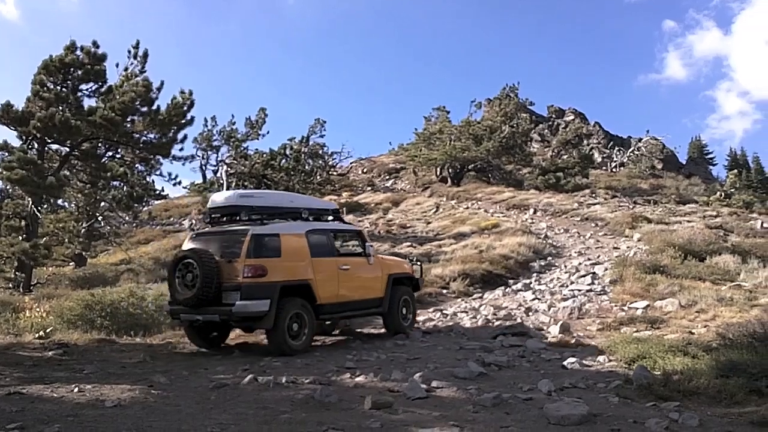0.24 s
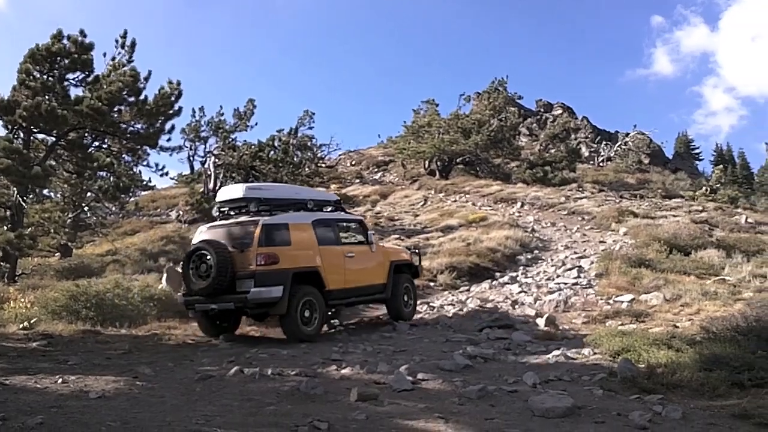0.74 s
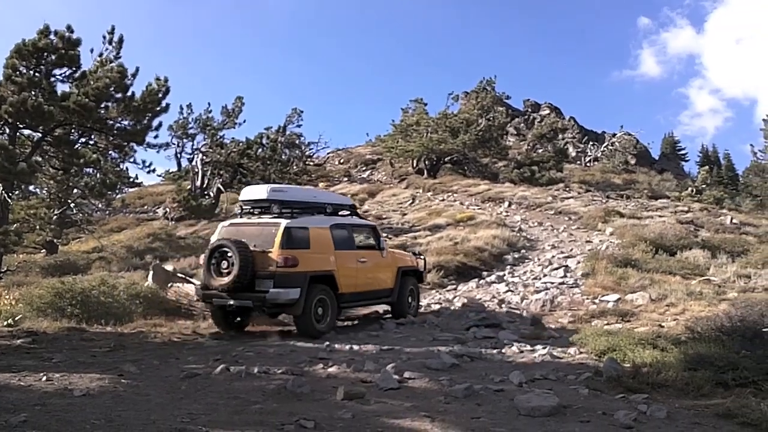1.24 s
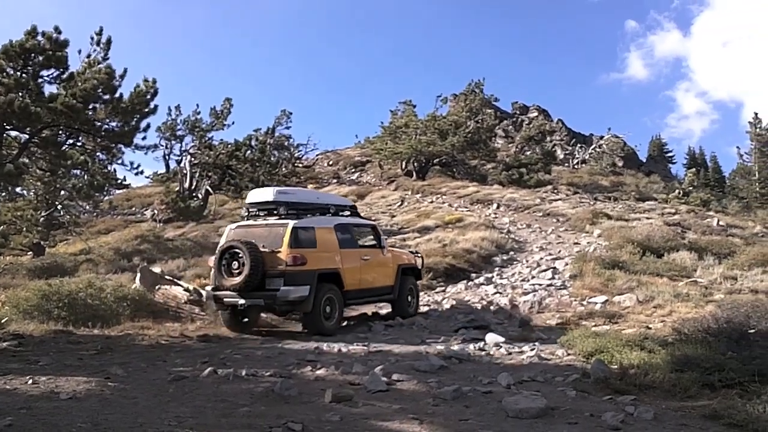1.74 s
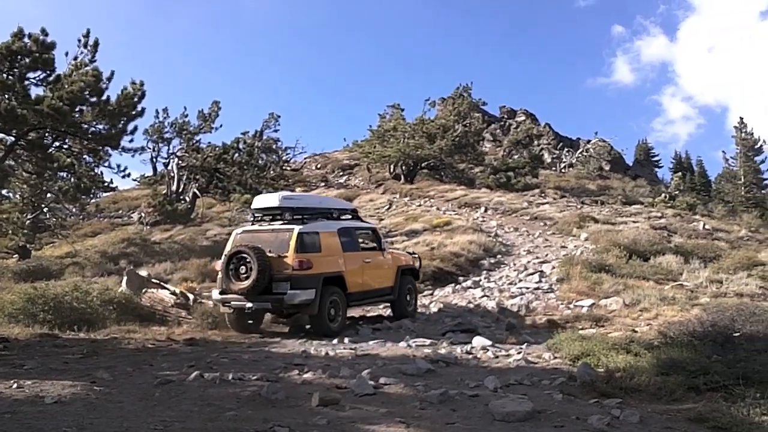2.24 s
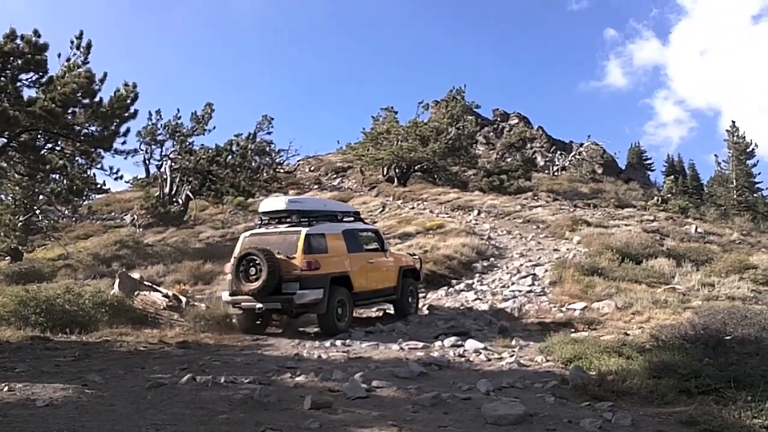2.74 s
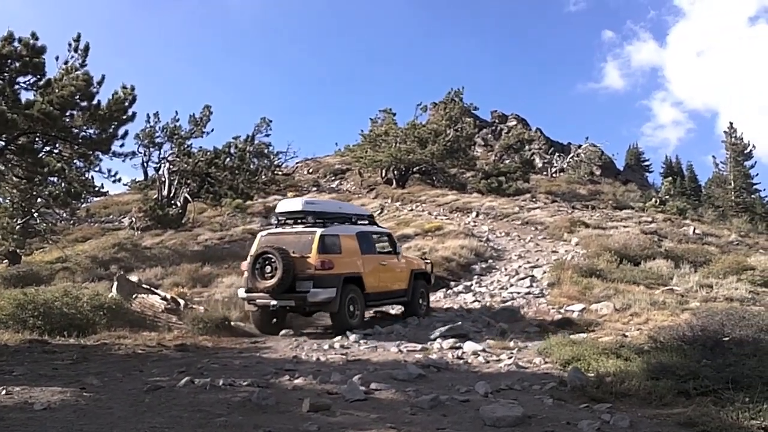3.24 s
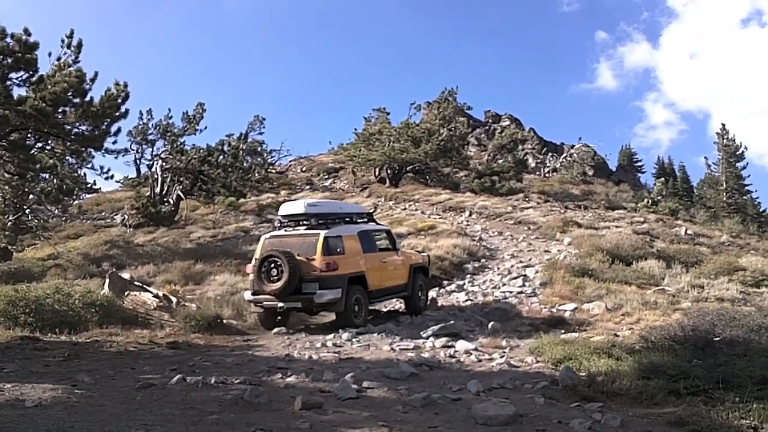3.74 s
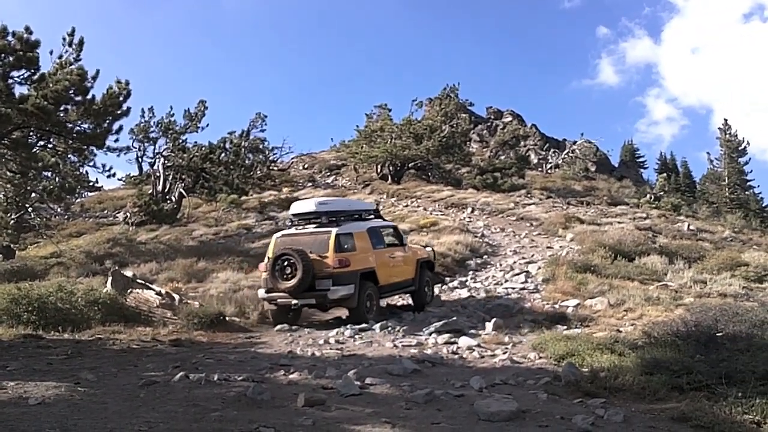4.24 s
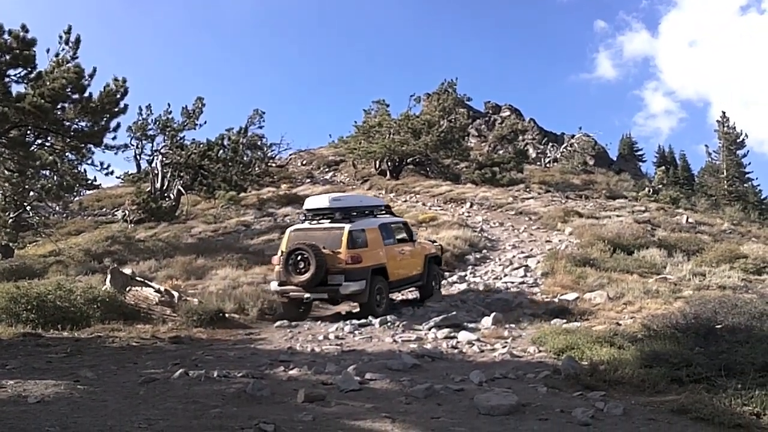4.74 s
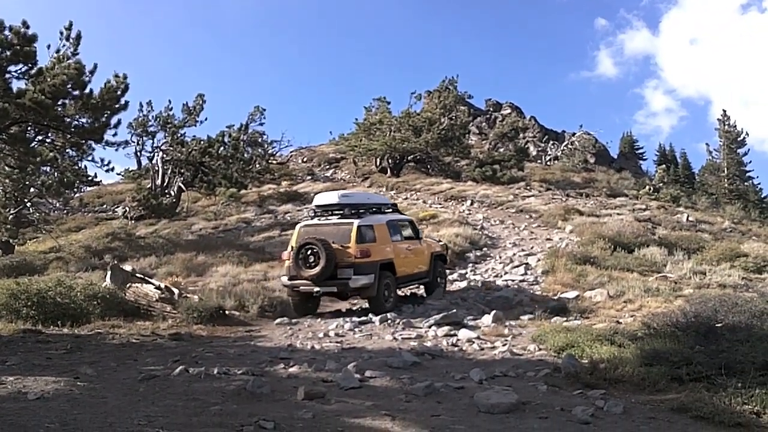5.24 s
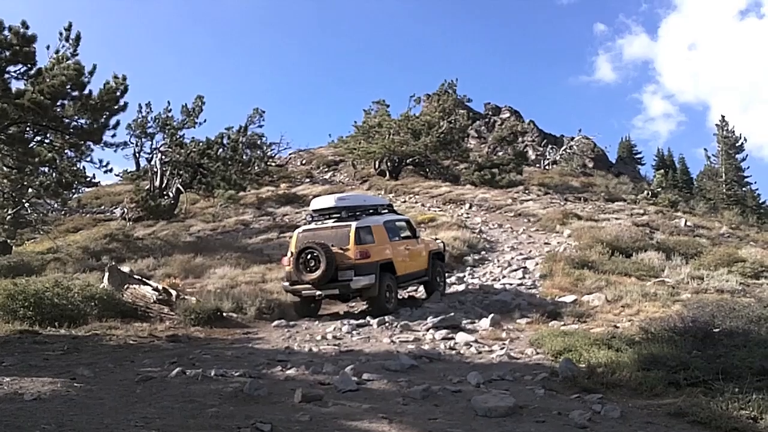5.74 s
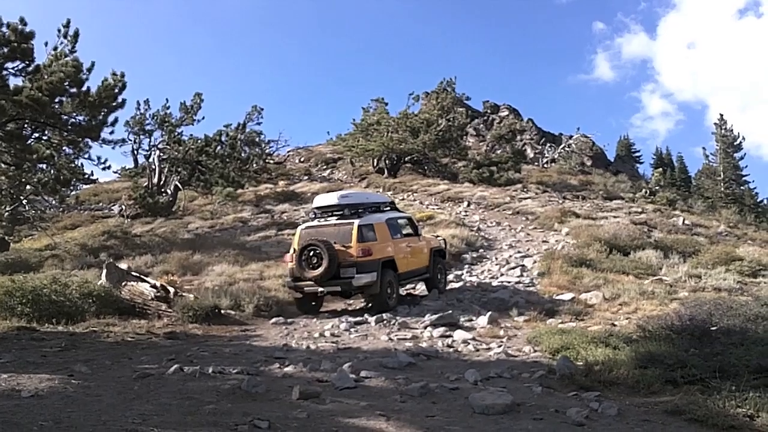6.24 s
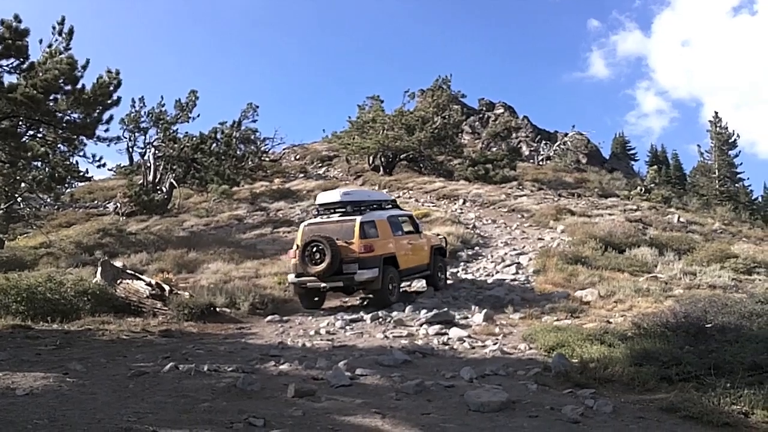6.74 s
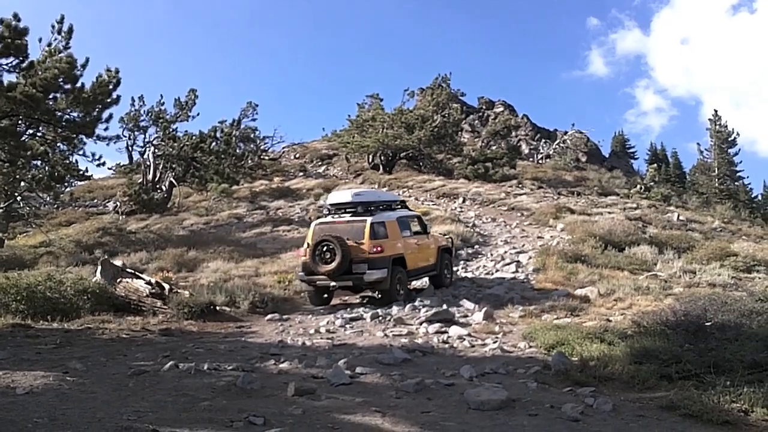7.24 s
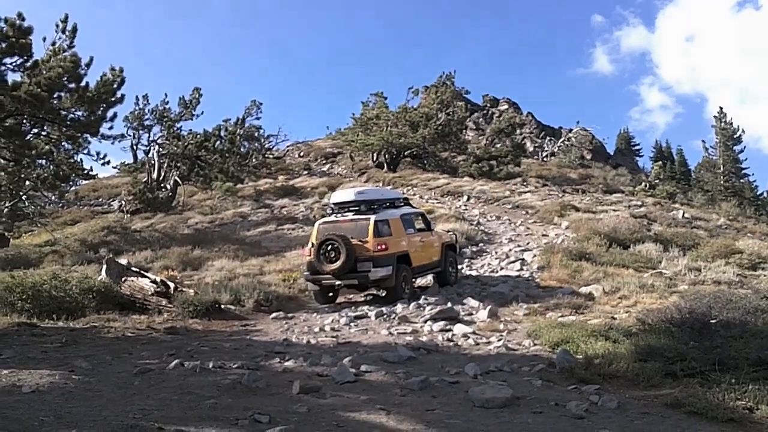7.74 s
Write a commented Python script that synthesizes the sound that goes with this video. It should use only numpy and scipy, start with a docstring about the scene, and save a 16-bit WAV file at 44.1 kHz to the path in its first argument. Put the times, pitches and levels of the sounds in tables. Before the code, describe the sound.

An off-road vehicle's engine booms in low gear, rising and falling as stones knock under its tyres, then drops to idle.

```python
"""Off-roader on a stony climb

A V6 crawls up a mountain track in low gear, drawing away, and drops to idle at the end.
Exhaust pulses ring the pipe, which booms under throttle; gas rasps, fan and gravel hiss,
stones knock under the tyres and the body thuds off a step. A small bird chips in the scrub,
and the open hillside gives stones and bird only a short scatter."""
import sys
import numpy as np
from scipy import signal
from scipy.fft import rfft, irfft, next_fast_len
from scipy.io import wavfile
from scipy.ndimage import uniform_filter1d, map_coordinates

SR = 44100
rng = np.random.default_rng(int(sys.argv[2]) if len(sys.argv) > 2 else 0)


def digitize_waveform(pressure):
    """Quantize a signal to 16-bit integers and store it at the path in sys.argv[1].

    Rows of a 2-D input are taken as channels; values are limited to [-1, 1].
    """
    field = np.atleast_2d(pressure).T
    bounded = np.clip(field, -1, 1)
    quanta = np.round(bounded * 32767).astype(np.int16)
    wavfile.write(sys.argv[1], SR, quanta)


N = 352359
TIME = np.arange(N) / SR


# Engine speed, as the firing rate of one cylinder bank: t/s, f/Hz
BANK_RATE = [(0.0, 26.69), (0.32, 29.43), (1.11, 29.38), (1.42, 26.1), (1.72, 25.44), (2.19, 27.63),
             (3.17, 27.01), (3.19, 26.29), (3.53, 26.76), (3.91, 25.65), (4.27, 26.83), (4.58, 24.12),
             (5.03, 23.44), (5.51, 20.85), (6.12, 26.97), (6.38, 26.78), (6.78, 23.44), (7.09, 19.08),
             (7.98, 19.18)]
# Hard pulls, a labouring crawl, then the throttle shuts and the idle recovers: t/s, level/dB
ENGINE_LOAD = [(0, -41.5), (.25, -36), (.95, -37.5), (1.4, -44), (2.15, -41), (3.9, -43.5), (5.6, -41),
               (6.2, -44), (6.85, -42.5), (6.98, -46.5), (7.18, -45.5), (7.28, -56.5), (7.44, -57),
               (7.7, -50)]

def engine(flywheel_s=0.12, wobble=0.0029):
    """The flywheel rounds off each change of speed; gives bank rate, cycles fired and load."""
    hz = uniform_filter1d(curve(TIME, BANK_RATE), int(flywheel_s * SR), mode="nearest")
    cycles = np.cumsum(hz * (1 + wobble * walk(18))) / SR
    return hz, cycles, curve(TIME, ENGINE_LOAD)


# Resonances of the exhaust pipe: f/Hz, width/Hz, level/dB
PIPE_MODES = [(53.6, 13, -10), (117.5, 11, 4.2), (162, 30, -5), (213, 25, -3)]
# Harmonics of the firing pulses: multiple of the bank rate, level/dB
PULSE_HARMONICS = [(2, 7), (3, -4), (5, 0.3), (6, 5), (7, -8), (8, 2.2), (9, -14.5), (10, -5), (11, -12.5)]

def exhaust(hz, cycles, load_db, roughness=0.12, idle_db=-10, muffler_hz=250):
    """Pulse harmonics sweep through the pipe's resonances; the muffler swallows the high ones."""
    idle = np.interp(hz, [19.6, 21.6], [1, 0])  # the throttle closes between these bank rates
    out = 0
    for k, db in PULSE_HARMONICS:
        ring = np.interp(TIME, TIME[::64], resonance(k * hz[::64], PIPE_MODES))
        # at idle the low harmonics fade and leave the sixth, sitting on the main resonance
        ease_db = 0 if k == 6 or k > 9 else idle_db / 2 if k == 2 else idle_db
        muffler = 1 / np.hypot(1, (k * hz / muffler_hz) ** 8)
        gain = undb(load_db + db + idle * ease_db) * muffler * (1 + roughness * walk(24))
        out += gain * np.real(ring * np.exp(2j * np.pi * k * cycles))
    return np.sqrt(2) * out


# The boom swells as the fourth harmonic climbs: f/Hz, level/dB
BOOM_SWELL = [(76, -65.5), (88, -50.5), (96, -42), (102, -39), (105.2, -33), (109.2, -23.5), (110.4, -21),
              (114, -18.5), (120, -18)]
# Bite of the harder pulses: multiple of the bank rate, level/dB against the boom
BOOM_OVERTONES = [(11, -38), (12, -33), (15, -37), (16, -36), (18, -37), (32, -51)]

def pipe_boom(hz, cycles, surge_db=0.16):
    """Under throttle the fourth harmonic climbs onto the pipe's main resonance and booms."""
    surge = np.gradient(hz, TIME)  # Hz/s: louder while gathering speed, softer while slowing
    level_db = curve(4 * hz, BOOM_SWELL) + surge_db * surge
    boom = np.cos(8 * np.pi * cycles + np.angle(resonance(4 * hz, PIPE_MODES)))
    bite = sum(undb(db) * (1 + 0.33 * walk(12)) * np.cos(2 * np.pi * k * cycles)
               for k, db in BOOM_OVERTONES)
    return np.sqrt(2) * (boom + bite) * undb(level_db) * (1 + 0.05 * walk(30))


# Hollow rumble of gas in the pipe: f/Hz, level/dB
FLOW_COLOUR = [(15, -4.5), (50, -9.5), (75, -11), (120, 8), (175, -4.5), (222, 4.5),
               (262, -17.5), (500, -42.5), (2000, -75.5)]

def gas_flow(hz, load_db):
    """Turbulent gas rings the same pipe; less flows as the engine slows."""
    rumble = colour(rng.standard_normal(N), FLOW_COLOUR)
    return rumble * undb(load_db - 0.5) * hz / hz.mean()


# Throaty midrange of the gas: f/Hz, level/dB
RASP_COLOUR = [(180, -12.5), (250, 1.5), (320, 0), (385, -5.5), (445, 1), (520, 0.5), (600, -11.5),
               (690, -20), (900, -27.5), (1300, -53.5)]

def gas_rasp(hz, cycles, load_db, throb=0.05, load_share=0.25):
    """Gas rasps in puffs at the bank rate, a little harder under load."""
    puffs = 1 + throb * np.cos(2 * np.pi * cycles)
    rasp = colour(rng.standard_normal(N) * puffs, RASP_COLOUR)
    effort_db = load_share * (load_db - np.median(load_db))
    level_db = -49 + effort_db + drive_db(hz, db_per_octave=18, db_per_s=-0.6)
    return rasp * undb(level_db + 0.99 * walk(12))


# Hiss shared by the fan and the tyres: f/Hz, level/dB
HISS_COLOUR = [(350, -22.5), (600, -2.5), (694, -10), (911, -5.5), (1160, -12.5), (1370, -7.5),
               (1550, -11.5), (1940, -8.5), (2410, -12.5), (2730, -19.5), (3070, -11.5), (4150, -11),
               (4800, -14.5), (5500, -37.5), (6120, -28), (7960, -54), (13500, -120)]

def fan_and_grit(hz, grains_per_s=500, grit_db=-10, spread_db=5):
    """The fan hisses with a slight flutter, and grit crackles under the tyres."""
    fan = colour(rng.standard_normal(N), HISS_COLOUR) * undb(walk(25))
    grains = (rng.random(N) < grains_per_s / SR) * rng.standard_normal(N)
    grains *= undb(spread_db * np.minimum(rng.exponential(size=N), 4))
    grit = undb(grit_db) * colour(grains, HISS_COLOUR)
    return (fan + grit) * undb(-55 + drive_db(hz, db_per_octave=11.5, db_per_s=-0.7025))


# Stones struck or ground by the tyres: t/s, contact/dB, ring/Hz, top cut/Hz, decay/s, grind/dB
STONE_HITS = [(.273, -25, 1420, 3500, .022, -13), (.282, -24.5, 1960, 4000, .02, -19.5),
              (0.502, -35, 1200, 6080, 0.052, -8.5), (1.023, -40, 2220, 9000, .17, 6.5),
              (1.096, -40, 3500, 9000, 0.17, -0.5), (2.701, -41.5, 1290, 1980, .05, 0),
              (2.972, -36.5, 3740, 8940, 0.068, -5), (3.492, -37.5, 594, 3020, 0.043, -6),
              (4.124, -38.5, 3500, 6000, 0.28, -5.5), (4.301, -37, 3740, 10000, 0.21, 3.5),
              (4.369, -25, 2100, 2270, 0.035, 6.5), (4.375, -35, 600, 4000, 0.16, -1.5),
              (4.479, -39.5, 4230, 8000, .027, -13), (5.191, -37, 3600, 6500, .16, 1.5),
              (6.215, -39.5, 770, 5000, 0.12, -6.5), (6.517, -31, 2200, 6000, 0.077, -4),
              (6.538, -37, 3370, 5000, .051, -2), (6.624, -34, 900, 4000, 0.093, -2.5),
              (6.637, -32.5, 720, 2000, 0.13, -2), (6.645, -32, 1260, 2000, 0.098, -9),
              (6.648, -34.5, 3360, 6040, .077, -6.5), (7.466, -48, 3520, 5000, .02, -6)]
# How a stone rings: multiple of its ring frequency, width over frequency, level/dB
STONE_RING = [(.55, 0.41, 0), (0.999, 0.17, 0), (1.901, 0.88, -7)]
# Tone of the stone knocks, full in the mids, with a dull, notched top: f/Hz, level/dB
STONE_COLOUR = [(150, -24), (450, -6), (4900, 1), (5500, -24), (6700, -11), (7800, -38), (10000, -9.5),
                (14000, -31)]

def stones(grind_trim_db=-6, softness=1.55):
    """Each stone gives one sharp contact, then a dying run of small slips, all ringing its modes."""
    out, t = np.zeros(N), TIME[:SR // 4]
    lead = 64  # samples ahead of the contact
    for start, peak_db, hz, cut_hz, t60, grind_db in STONE_HITS:
        modes = [(hz * ratio, hz * ratio * width, db) for ratio, width, db in STONE_RING]

        def ring(f):
            dull = np.hypot(1, (f / (softness * hz)) ** 2)  # bigger, lower stones touch for longer
            blunt = np.hypot(1, (f / cut_hz) ** 4)  # a blunt contact cuts off the top
            return resonance(f, modes) * undb(curve(f, STONE_COLOUR)) / (dull * blunt)

        contact = shape(signal.unit_impulse(len(t), lead), ring)
        slips = rng.standard_normal(len(t)) * (rng.random(len(t)) < 0.15)
        envelope = undb(-60 * t / t60) * np.clip((t * SR - lead) / lead, 0, 1)
        grind = undb(grind_db + grind_trim_db) * unit(shape(slips, ring)) * envelope
        add(out, start - lead / SR, undb(peak_db) * (contact / np.abs(contact).max() + grind))
    return out


# Dull thuds as the wheels drop off a step: t/s, level/dB, f/Hz
WHEEL_DROPS = [(5.82, -28.5, 42), (5.935, -35, 36), (5.94, -34, 85), (5.999, -34, 35)]

def body_thuds(decay_s=0.016):
    """The body takes each drop with a few heavily damped swings."""
    out, t = np.zeros(N), TIME[:SR // 4]
    envelope = t / decay_s * np.exp(1 - t / decay_s)
    for start, db, hz in WHEEL_DROPS:
        add(out, start, undb(db) * envelope * np.sin(2 * np.pi * hz * t))
    return out


# Chips from the scrub: t/s, length/s, starting f/Hz, level/dB
BIRD_NOTES = [(1.62, .066, 4910, -52.5), (2.733, 0.029, 5850, -57), (3.39, 0.033, 5150, -52.5),
              (3.751, .028, 6140, -62.5), (4.04, 0.066, 5700, -68), (5.739, .038, 5900, -71),
              (7.498, 0.092, 4800, -57.5)]

def bird(top_hz=6100, hoarse_hz=370, overtone_db=-22, fade_db=-7):
    """Short, hoarse notes: a narrow band of noise steps to the same high pitch as it fades."""
    def band(f):
        return np.exp(-(f / hoarse_hz) ** 2 / 2)

    out = np.zeros(N)
    for start, length, start_hz, db in BIRD_NOTES:
        progress = np.linspace(0, 1, int(length * SR))
        a, b = (unit(shape(rng.standard_normal(SR // 4), band))[:len(progress)] for _ in range(2))
        step = (1 + np.tanh(14 * (progress - 0.45))) / 2
        pitch = start_hz + (top_hz - start_hz) * step
        tone = np.exp(2j * np.pi * np.cumsum(pitch) / SR)
        swell = np.sqrt(np.abs(np.sin(np.pi * progress))) * undb(db + fade_db * progress)
        add(out, start, swell * np.real((a + 1j * b) * (tone + undb(overtone_db) * tone ** 2)))
    return out


def hillside(x, wet_db=-12, t60=0.81):
    """Rocks and scrub scatter a short, thin tail."""
    t = TIME[:SR // 2]
    tail = rng.standard_normal(len(t)) * undb(-60 * t / t60) * (t > 0.004)
    return x + undb(wet_db) * signal.fftconvolve(x, tail / np.linalg.norm(tail))[:N]


# Bed of still mountain air: f/Hz, level/dB
AIR_COLOUR = [(25, -10.5), (100, 0.5), (220, 6.5), (330, -21), (900, -29), (2200, -28.5), (4400, -26.5),
              (5600, -38), (8000, -42.5), (14000, -39.5)]

def still_air(level_db=-55):
    """A steady low hush with a faint, airy top."""
    return undb(level_db) * colour(rng.standard_normal(N), AIR_COLOUR)


def drive_db(hz, db_per_octave, db_per_s, crawl_hz=26, halt_s=7.34):
    """Fader for rasp and hiss: up with engine speed, down with distance, dying away after the halt."""
    halt_db = -12 * np.maximum(TIME - halt_s, 0)
    return db_per_octave * np.log2(hz / crawl_hz) + db_per_s * TIME + halt_db


def undb(db):
    """Decibels to gain."""
    return 10 ** (np.asarray(db) / 20)


def unit(x):
    """Scale to rms 1."""
    return x / np.sqrt(np.mean(x ** 2))


def curve(x, table):
    """Read a two-column table at x, along straight lines."""
    return np.interp(x, *np.transpose(table))


def walk(rate):
    """Smooth random drift with spread near 1 that changes rate times a second."""
    return map_coordinates(rng.standard_normal(4096), [TIME * rate], order=2, mode="wrap")


def resonance(hz, modes):
    """Complex gain at hz of modes listed as f/Hz, width/Hz, level/dB."""
    return sum(undb(db) * 1j * hz * w / (f * f - hz * hz + 1j * hz * w) for f, w, db in modes)


def shape(x, response):
    """Filter with a gain given as a function of frequency."""
    size = next_fast_len(len(x) + 4096)
    hz = np.arange(size // 2 + 1) * SR / size
    return irfft(rfft(x, size) * response(hz), size)[:len(x)]


def colour(x, points):
    """Equalise through points of f/Hz, level/dB, then scale to rms 1."""
    f, db = np.transpose(points)
    return unit(shape(x, lambda hz: undb(np.interp(np.log(hz + 1), np.log(f), db))))


def add(out, start, x):
    """Mix a short sound in at start seconds."""
    i = int(start * SR)
    out[i:i + len(x)] += x[:N - i]


def scene():
    """The vehicle, the stones and the bird over still mountain air."""
    hz, cycles, load_db = engine()
    pipe = exhaust(hz, cycles, load_db) + pipe_boom(hz, cycles) + gas_flow(hz, load_db)
    vehicle = pipe + gas_rasp(hz, cycles, load_db) + fan_and_grit(hz) + body_thuds()
    return (vehicle + still_air() + hillside(stones() + bird()))[None]


def record(dry, dip_hz=2750, top_hz=15000):
    """A narrow notch thins the upper mids, and the top is cut."""
    dipped = signal.lfilter(*signal.iirnotch(dip_hz, Q=6, fs=SR), dry)
    return signal.sosfilt(signal.ellip(8, 0.2, 70, top_hz, fs=SR, output="sos"), dipped)


dry = scene()
out = record(dry)
digitize_waveform(out)
```